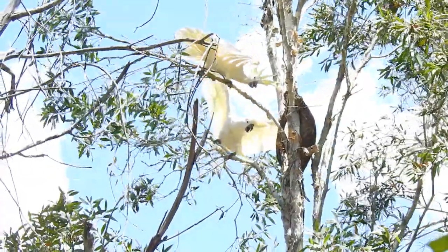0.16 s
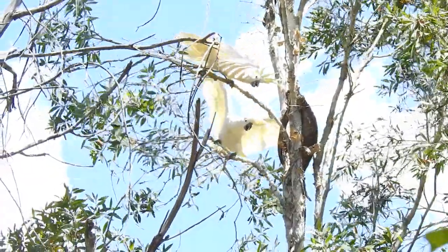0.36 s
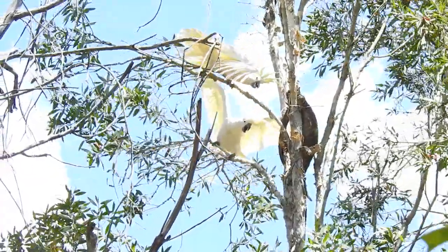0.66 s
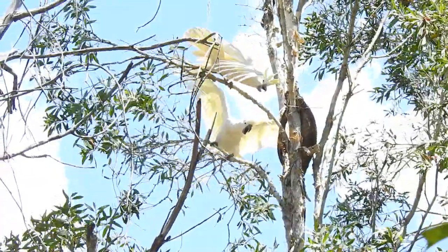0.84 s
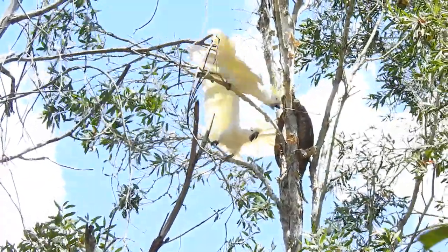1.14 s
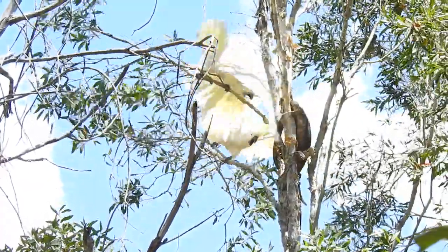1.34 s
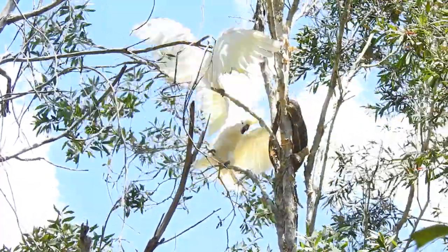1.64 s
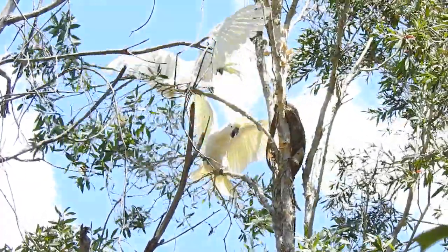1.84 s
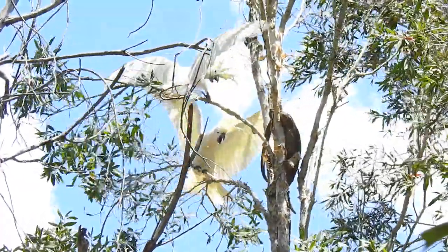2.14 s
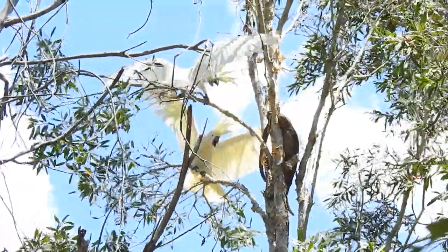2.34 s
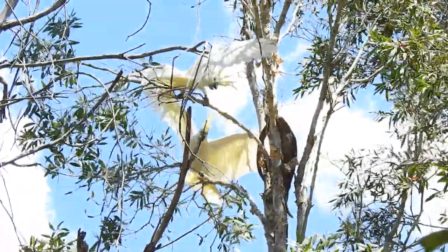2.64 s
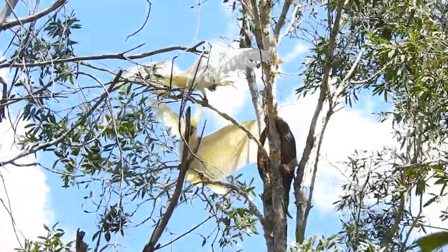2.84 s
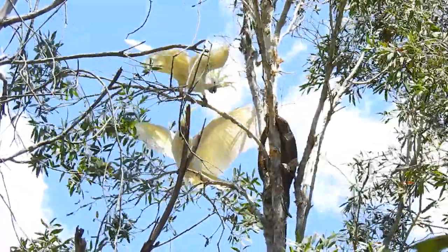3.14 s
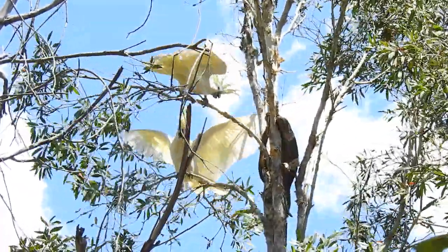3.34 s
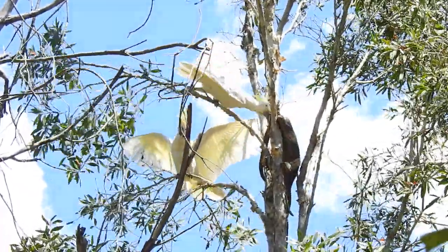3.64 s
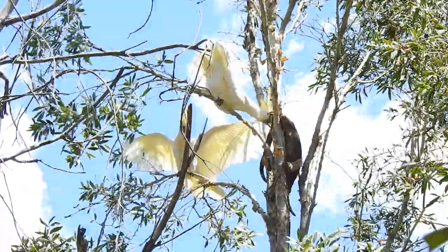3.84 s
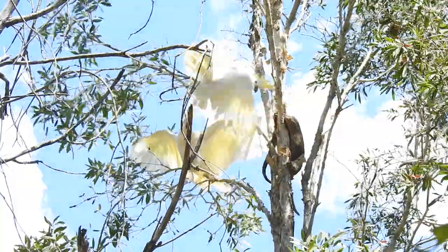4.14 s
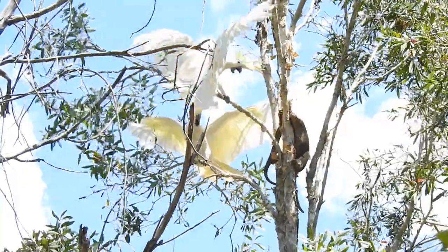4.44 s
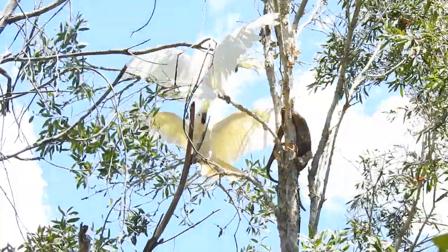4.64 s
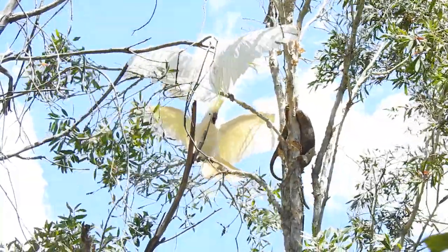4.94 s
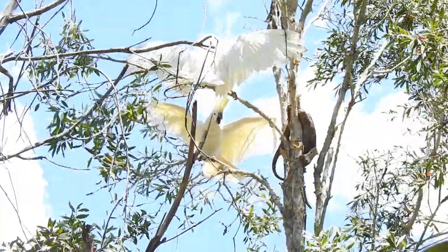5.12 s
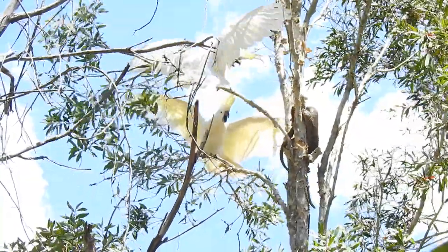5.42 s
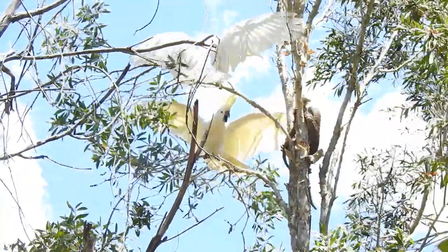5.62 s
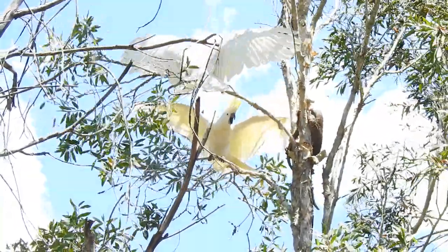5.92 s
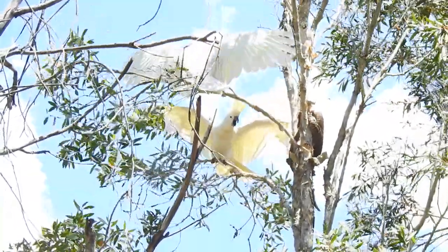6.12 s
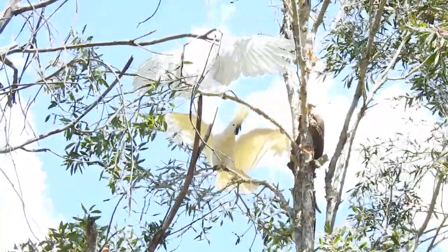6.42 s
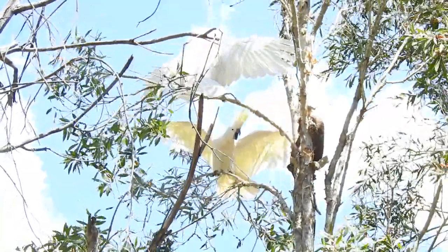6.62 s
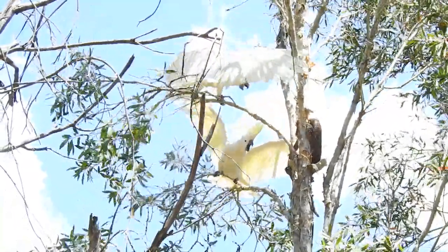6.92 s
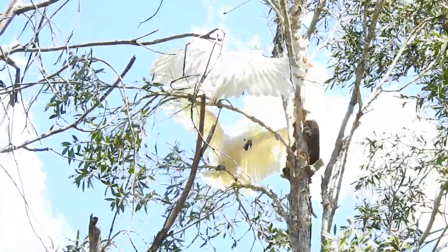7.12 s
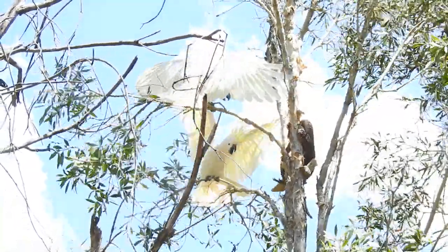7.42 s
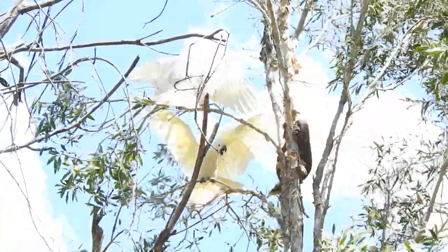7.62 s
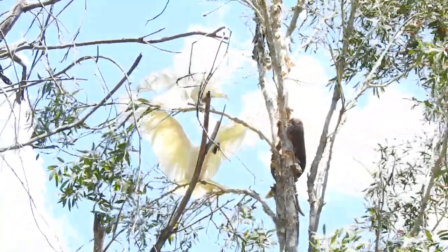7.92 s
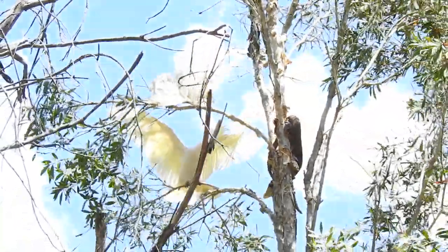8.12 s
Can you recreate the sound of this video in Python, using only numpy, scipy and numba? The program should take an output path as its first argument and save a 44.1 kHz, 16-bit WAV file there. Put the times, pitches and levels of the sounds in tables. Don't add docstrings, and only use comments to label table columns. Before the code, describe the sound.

Two cockatoos screech from a tree a few metres above a handheld stereo microphone. The end of a call is heard until 0.15 s, its echo fading into thin insect hiss and light breeze. At 0.7 s a harsh screech creaks open and swells, followed almost without a break by others at 1.7 and 2.65 s, ending at 3.35 s. The sound is dense, bright, torn rasp, briefly tightening into a nasal buzz near 300 Hz. Soft low wing puffs and wind buffets lie beneath between 1.4 and 2.5 s. Quiet bush follows, with one dry twig tick at 4.1 s. Two joined screeches run from 4.2 to 6.15 s, the first briefly buzzing lower. After a short gap, two more fill 6.35 to 8.3 s, barely separated at 7.4 s. Leaves and trunks smear every call; the loudest peaks are squeezed and slightly clipped.

```python
import sys
import numpy as np
from scipy import signal
from scipy.fft import rfft, irfft, next_fast_len
from scipy.io import wavfile
from scipy.ndimage import uniform_filter1d
from numba import njit

SR = 44100
rng = np.random.default_rng(int(sys.argv[2]) if len(sys.argv) > 2 else 0)


def boost(x):
    u = np.asarray(x, float) / 20
    return 10 ** u


def materialize(psi):
    bounded = np.clip(np.atleast_2d(psi).T, -1, 1)
    quanta = np.round(bounded * 32767).astype(np.int16)
    wavfile.write(sys.argv[1], SR, quanta)


N = 364266
TIME = np.arange(N) / SR
HZ = np.fft.rfftfreq(next_fast_len(N + SR), 1 / SR)

# start_s, end_s, effort_db, attack_s, sunk_db (drop of the voice before the start)
SCREECH_ROWS = [
    (-.2, 0.161, -16.5, .1, 25),
    (0.679, 1.691, -16, 0.19, 24),
    (1.711, 2.638, -16.5, 0.1, 9.5),
    (2.659, 3.35, -17.5, 0.067, 10),
    (4.176, 5.11, -17, 0.061, 32),
    (5.098, 6.151, -17, 0.041, 0.5),
    (6.346, 7.402, -16.5, 0.17, 26),
    (7.434, 8.283, -16, 0.037, 14.5),
]
SILENT_DB = 20


def unit(x):
    return x / np.sqrt(np.mean(x ** 2))


def shape(x, response):
    size = 2 * len(HZ) - 2
    return irfft(rfft(x, size) * response, size)[..., :N]


def colour(points):
    hz, db = np.transpose(points)
    return boost(np.interp(np.log(HZ + 1), np.log(np.maximum(hz, 1)), db))


def ring(modes):
    def resonance(hz, width):
        return 1j * HZ * width / (hz * hz - HZ * HZ + 1j * HZ * width)

    total = 0
    for k, (hz, width, db) in enumerate(modes):
        total = total + (-1) ** k * boost(db) * resonance(hz, width) * resonance(hz, 4 * width)
    return total


@njit
def svf(x, hz, width):
    y, band, low = np.empty(len(x)), 0., 0.
    for i in range(len(x)):
        g, k = np.tan(np.pi * hz[i] / SR), width / hz[i]
        v = (band + g * (x[i] - low)) / (1 + g * (g + k))
        band = 2 * v - band
        low += 2 * g * v
        y[i] = k * v
    return y


def curves(table):
    s, *columns = np.transpose(table)
    return [np.interp(TIME, s, column) for column in columns]


def spans(rows, edge_s):
    step = np.max([height * (TIME >= a) * (TIME < b) for a, b, height in rows], axis=0)
    return uniform_filter1d(step, size=int(edge_s * SR))


def walk(rate):
    hold = int(SR / rate)
    steps = np.repeat(rng.standard_normal(N // hold + 1), hold)
    return 1.3 * uniform_filter1d(uniform_filter1d(steps, hold), hold)[:N]


def bush():
    # frequency_hz, density_db (per Hz)
    bush_points = [(120, -24), (200, -9), (241, -15.5), (291, -13.5), (324, -8.5), (397, -12.5),
                   (450, -15.5), (643, -13), (729, -19.5), (965, -18.5), (3980, -22), (6550, -14.5),
                   (8280, -25), (10800, -38.5), (18200, -120)]
    # frequency_hz, density_db (per Hz)
    wind_points = [(12, -60), (20, -25), (70, 4.5), (130, -1), (189, 2), (247, -19.5), (300, -21),
                   (390, -38), (660, -120)]
    # centre_s, level_db (over the breeze, negative for a lull), half_length_s
    swell_rows = [
        (1.73, 12.5, 0.18),
        (2.5, 21.5, 0.052),
        (3.1, 7.2, .25),
        (3.85, -6, 0.38),
        (.65, -6, 0.089),
    ]
    breeze_db = -52
    mid, side = (shape(rng.standard_normal(N), colour(bush_points)) for _ in range(2))
    side = shape(side, np.clip(HZ / 8000, .15, 1))
    hiss = unit(np.array([mid + side, mid - side])) * boost(-38.5 - 2.5 + .5 * walk(1.94))
    ports = [unit(shape(rng.standard_normal(N), colour(wind_points))) * boost(2.2 * walk(5)) for _ in range(2)]
    swell_db = sum(db * np.exp(-((TIME - s) / half) ** 2) for s, db, half in swell_rows)
    return hiss + np.array(ports) * boost(breeze_db + swell_db)


def knocks():
    # start_s, level_db, pitch_hz, pan_db (left minus right)
    wing_rows = [
        (1.44, -41, 137, 18.5),
        (1.662, -35.5, 170.7, -17),
        (2.037, -43, 71, 7),
        (2.479, -34, 88.2, -7),
    ]
    # start_s, level_db, pitch_hz
    twig_rows = [
        (4.0777, -28, 6440),
    ]
    out = np.zeros((2, N))
    for s, db, hz, pan_db in wing_rows:
        puff = np.exp(-((TIME - s - .015) / 0.012) ** 2) * np.sin(2 * np.pi * hz * TIME)
        out += boost(db + np.array([[pan_db], [-pan_db]]) / 2) * puff
    for s, db, hz in twig_rows:
        burst = rng.standard_normal(N) * np.exp(-np.abs(TIME - s - .003) / 0.0057)
        wood = ring([(hz, 1500, 0), (900, 600, -10)]) / (1 + (HZ / 8000) ** 8)
        out += boost(db) * 2.2 * shape(burst, wood)
    return out


def groans():
    # start_s, end_s, pitch_hz, width_hz, level_db
    groan_rows = [
        (0.984, 1.36, 634, 180, -37.5),
        (4.27, 4.53, 643, 21, -40),
        (3.7, 3.41, 680, 200, -23),
    ]
    out = 0
    for start, stop, hz, width, db in groan_rows:
        swell = np.clip(np.minimum(TIME - start, stop - TIME) / 0.021, 0, 1)
        out = out + boost(db) * swell * unit(shape(rng.standard_normal(N), ring([(hz, width, 0)])))
    return out


def pitch(locks):
    points = []
    for start, stop, first_hz, last_hz, _ in locks:
        points += [(start, first_hz), (stop, last_hz)]
    return curves(points)[0]


def effort():
    quick_part, quick_rise = 0.4, 0.87
    release_s, sag_db = 0.039, 0.46
    tire_s, tire_db, shy_db = .25, -4.5, -4
    points, tired, gate = [], 0, []
    followers = SCREECH_ROWS[1:] + SCREECH_ROWS[:1]
    for (start, end, db, attack, sunk_db), after in zip(SCREECH_ROWS, followers):
        points += [(start, db - sunk_db),
                   (start + quick_part * attack, db - (1 - quick_rise) * sunk_db),
                   (start + attack, db),
                   (end - release_s, db - sag_db),
                   (end, db - min(after[4], SILENT_DB))]
        shy = np.clip(1 - (TIME - start) / attack, 0, 1) * (TIME >= start) * (sunk_db > SILENT_DB)
        spent = np.clip(1 - (end - TIME) / tire_s, 0, 1) * (TIME < end)
        tired = tired + tire_db * spent + shy_db * shy
        gate.append((start, end if after[4] > SILENT_DB else after[0], 1.))
    return boost(curves(points)[0]) * spans(gate, .002), tired


@njit
def fire(hz, stretch, size):
    pulses, phase, k = np.zeros(len(hz) + 1), 0., 0
    for i in range(len(hz)):
        step = hz[i] * stretch[k] / SR
        phase += step
        if phase >= 1:
            phase, k = phase - 1, k + 1
            pulses[i] += size[k] * phase / step
            pulses[i + 1] += size[k] * (1 - phase / step)
    return pulses[:-1]


def syrinx(hz, jitter, scatter_db):
    chance = rng.standard_normal((N // 40, 2)).T
    return unit(fire(hz, np.exp(jitter * chance[0]), boost(scatter_db * chance[1])) / np.sqrt(hz))


def turmoil(loose_hz, pitch_hz):
    # start_s, end_s, rate_hz (pulses)
    creak_rows = [
        (.676, .76, 190),
        (1.735, 1.8, 125),
        (4.19, 4.27, 135),
        (6.36, 6.44, 160),
        (7.46, 7.53, 100),
        (7.59, 7.63, 160),
    ]
    creak = np.zeros(N)
    for start, stop, rate in creak_rows:
        creak[int(start * SR):int(stop * SR)] = rate
    creaking = creak > 0
    beats = syrinx(np.where(creaking, creak, loose_hz), jitter=.16, scatter_db=1.6)
    burst = unit(np.convolve(beats, np.hanning(220), "same") * rng.standard_normal(N))
    fill = .6 * syrinx(pitch_hz, jitter=.15, scatter_db=2.5) + boost(-4) * rng.standard_normal(N)
    return (.62 * beats + .68 * burst) * np.where(creaking, 1.25, 1) + fill * np.where(creaking, .45, 1)


def steady_buzz(hz, count):
    phase = 2 * np.pi * np.cumsum(hz * (1 + .0008 * walk(60))) / SR
    return unit(np.sin((count + .5) * phase) / np.sin(phase / 2 + 1e-9) - 1)


def buzz_band(buzz, orders, pitch_hz, modes, band):
    edges_hz = [0, 1550, 2500, 4000, 30000]
    last_db = orders[-1][1]
    points = [(k * pitch_hz, db) for k, db in orders] + [(10500, last_db - 24), (16000, last_db - 50)]
    inside = (HZ >= edges_hz[band]) & (HZ < edges_hz[band + 1])
    return unit(shape(buzz, colour(points) * inside * np.exp(1j * np.angle(ring(modes)))))


def cockatoos():
    # centre_hz, width_hz, level_db
    pipe = [(313, 130, -26.5), (597, 360, -10), (946, 106, 2.5), (1191, 99, -0.5), (1425, 17, 6.5)]
    throat = [(1810, 630, -8.5), (2076, 583, -2), (2294, 82, 4)]
    beak = [(2662, 705, -3.85), (3330, 360, -3), (3583, 236, 1)]
    rasp = [(4546, 1040, 2.5), (5200, 590, 3.5), (6310, 1250, 3), (7200, 1390, 3.5), (8045, 1685, -4.5),
            (10370, 4500, -46)]
    # level_db at rest, then change_db for one step of neck stretch
    rest_db = [-15, -0.5, .5, -1.5]
    stretch_db = [-1.5, 3, -0.5, -0.5]
    lock_grip = [.75, 1.1, .6, .55]
    # harmonic (multiple), level_db
    lower_orders = [(1, -26), (2, -26), (3, -8.5), (4, -13.5), (5, -4), (6, -6), (7, -6.5), (8, -13),
                    (9, -2), (10, -0.5), (11, -1.5), (12, -4), (13, -11.5), (14, -9.5), (15, -5),
                    (16, -7.5), (17, -11.5), (18, -17), (19, -12), (20, -12.5), (21, -14.5), (22, -12),
                    (23, -11.5), (24, -10.5), (25, -19), (26, -14), (27, -17), (28, -22)]
    upper_orders = [(1, -23), (2, -23), (3, -16.5), (4, -12), (5, -6.5), (6, 6.5), (7, 9.5), (8, -4),
                    (9, -3), (10, -9.5), (11, -8), (12, -4), (13, -16.5), (14, -2.5), (15, -3.5), (16, -9),
                    (17, -8.5), (18, -12), (19, -15), (20, -3.5), (21, -9), (22, -3.5), (23, -7), (24, -18),
                    (25, -4), (26, -21), (27, -7), (28, -17.5)]
    # time_s, stretch (-2 to 1), tongue_hz
    neck_rows = [(0, -2, 5600), (.86, -0.61, 5930), (.97, -0.016, 5050), (1.2, -0.49, 5000),
                 (1.5, 0.54, 5200), (1.81, -.6, 5300), (2.07, 0.51, 5840), (2.6, -0.085, 4400),
                 (3.09, -0.76, 5920), (4.22, 0.29, 4350), (4.4, 0.75, 5830), (4.83, 0.075, 5470),
                 (5.05, -2.2, 6140), (5.27, 0.75, 5460), (6.12, -0.77, 5200), (6.51, 0.64, 4930),
                 (6.8, -0.027, 5500), (8.26, -0.35, 5600)]
    # start_s, end_s, extra_ring (0-1)
    wide_rows = [
        (.92, 1.28, 0),
        (1.597, 1.678, 0),
        (1.717, 1.902, 0.2),
        (2.426, 2.6, 0.07),
        (2.83, 3.298, 0.33),
    ]
    # start_s, end_s, first_hz, last_hz, share (of power, 0-1)
    lock_rows = [(-.02, .095, 282.6, 278.4, .98), (.815, .895, 289.5, 296, .9),
                 (.935, 1.15, 293.8, 301.3, .72), (1.15, 1.262, 301.6, 302.2, .75),
                 (2.09, 2.14, 292.6, 293.5, .78), (2.3, 2.34, 295.7, 295.7, .65),
                 (3.02, 3.08, 286.4, 283.4, .87), (4.345, 4.425, 213.6, 215.5, .8),
                 (4.465, 4.497, 216, 216.2, .35), (4.56, 4.735, 288, 290.6, .12),
                 (4.735, 4.79, 290.6, 292.8, .33), (4.82, 4.96, 292, 288.3, .75),
                 (4.985, 5.1, 287.9, 288, .95), (6.46, 6.56, 292.4, 294.6, .97),
                 (6.56, 6.615, 294.5, 294, .58), (6.755, 6.825, 296.2, 299.2, .5),
                 (7.675, 7.72, 293.8, 292.5, .86), (7.91, 8.045, 288.2, 286.5, .43)]
    # start_s, end_s, share (0-1)
    under_rows = [
        (.77, 1.1, .15),
        (1.1, 1.43, .38),
        (1.8, 2.47, .1),
        (4.24, 4.52, .25),
        (4.79, 4.95, .2),
        (4.95, 5.0, .45),
        (5.9, 6.5, .08),
        (7.77, 8.15, .33),
    ]
    # start_s, end_s
    upper_rows = [
        (.4, 2.475),
        (5.8, 7.765),
    ]
    edge_s, gape_s = .02, 0.076

    gain, tired = effort()
    stretch, tongue_hz = curves(neck_rows)
    pitch_hz = pitch(lock_rows)
    gape_hz = 2672 + (3730 - 2672) * spans([(a, b, 1.) for a, b, _ in wide_rows], gape_s)
    low = uniform_filter1d(1. * (pitch_hz < 250), size=int(gape_s * SR))
    own_lock = spans([(a, b, share) for a, b, _, _, share in lock_rows], edge_s)
    locked = np.maximum(own_lock, spans(under_rows, 2 * edge_s)).clip(.015, 1)
    upper = spans([(a, b, 1.) for a, b in upper_rows], 2 * edge_s)
    throat_hz = 2050 + 60 * stretch.clip(0, 1) * (1 - locked)
    for start, _, _, _, sunk_db in SCREECH_ROWS:
        if sunk_db > SILENT_DB:
            throat_hz = throat_hz + 320 * np.exp(-np.abs(TIME - start) / 0.046)

    flap = np.exp(-2j * np.pi * 0.001494 * 4000 * np.log(1 + HZ / 4000))
    loose_hz = 157.63 * np.exp(.15 * walk(3))
    buzz = shape(steady_buzz(pitch_hz, count=48), flap)
    chaos = shape(turmoil(loose_hz, pitch_hz), flap)

    # (centre Hz, width Hz, strength)
    moving = [(3 * np.clip(pitch_hz, 284, 302) + 14 * walk(9), 50., 2 + .6 * walk(5)),
              (throat_hz + 45 * walk(9) * (1 - locked), 110., 2 + .4 * walk(5)),
              (gape_hz + 110 * walk(10), 220., .7 + .3 * walk(6) + 2 * spans(wide_rows, gape_s)),
              (tongue_hz + 250 * walk(10), 500., 1.5)]
    out, sign = 0, 1
    for band, modes in enumerate((pipe, throat, beak, rasp)):
        db = rest_db[band] + stretch_db[band] * stretch
        share = locked ** lock_grip[band]
        if modes is beak:
            db = db + 0.5 * low
        if modes is rasp:
            db = db + tired
            share = share * (1 - (1 - 0.45) * low)
        centre_hz, width, strength = moving[band]
        lower_buzz = buzz_band(buzz, lower_orders, 288, modes, band)
        upper_buzz = buzz_band(buzz, upper_orders, 301, modes, band)
        steady = (1 - upper) * lower_buzz + upper * upper_buzz
        steady = unit(steady + .9 * strength * svf(steady, centre_hz, 2 * width))
        torn = shape(chaos, ring(modes))
        torn = unit(torn + strength * svf(torn, centre_hz, width))
        out = out + sign * boost(db) * (np.sqrt(share) * steady + np.sqrt(1 - share) * torn)
        sign *= (-1) ** len(modes)
    hollow = 0.63 * low * svf(out, 1580 + 0 * TIME, 500.)
    return (out - hollow) * gain


def echo(t60, start_s, dull_hz):
    t = np.arange(SR) / SR
    tail = rng.standard_normal((2, SR)) * boost(-60 * t / t60) * (t > start_s)
    return rfft(tail / np.sqrt(np.sum(tail[0] ** 2)), 2 * len(HZ) - 2) / (1 + 1j * HZ / dull_hz)


def scene():
    # frequency_hz, level_db
    leaf_points = [(60, 9), (100, -5), (180, 1), (300, -30), (520, -46), (900, -27.5), (1540, -9),
                   (2650, -15.5), (4560, -11), (7830, -5)]
    # frequency_hz, balance_db
    balance_points = [(60, -2), (100, -3), (180, -3), (300, -4.5), (520, -4), (900, 1.7), (1540, 3.5),
                      (2650, 0.1), (4560, 0.4), (7830, -0.3)]
    call = cockatoos() + groans()
    scatter = shape(call, echo(.13, 0, 30000)[0] * colour(leaf_points) * boost(-1))
    lean = colour(balance_points) ** .5
    direct = np.array([shape(call, lean) + scatter, shape(call, 1 / lean) - scatter])
    near = shape(call, echo(0.097, 0.0052, 9000)[0])
    far = shape(call, echo(0.96, 0.013, 2950))
    echoes = boost(-11.0) * near + boost(-14.5) * (1.1 * far[0] + 0.73 * far)
    return direct + echoes + bush() + knocks()


def band_limit(x):
    return signal.sosfilt(signal.butter(12, 15900, fs=SR, output="sos"), x)


def record(dry):
    limit_db, limit_s, limit_grip = -13.5, 0.013, 0.48
    soft = signal.sosfilt(signal.butter(2, 11000, fs=SR, output="sos"), dry)
    power = np.mean(soft ** 2, axis=0)
    for _ in range(2):
        power = uniform_filter1d(power, int(limit_s * SR))
    soft = soft * (1 + (power / boost(2 * limit_db)) ** 2) ** (-limit_grip / 4)
    hiss = shape(rng.standard_normal(dry.shape), boost(-63) * (HZ > 10500))
    mix = np.clip(soft * boost(1.5) + hiss, -1, 1)
    return band_limit(mix)


dry = scene()
out = record(dry)
materialize(out)
```